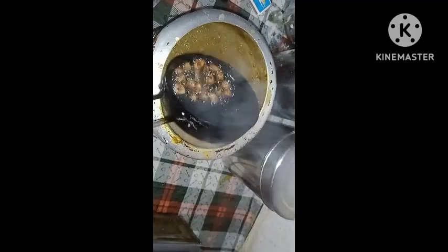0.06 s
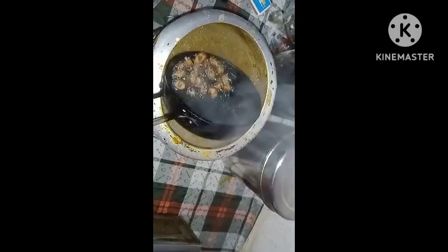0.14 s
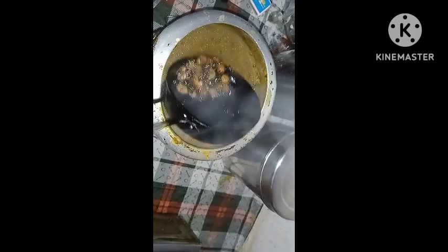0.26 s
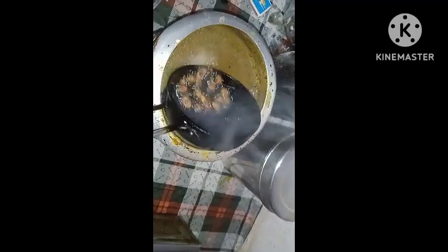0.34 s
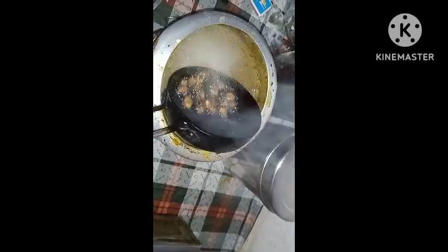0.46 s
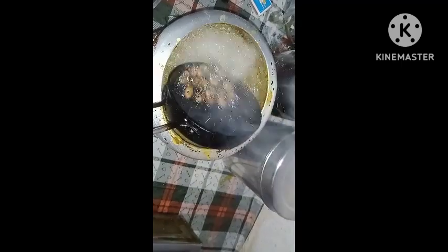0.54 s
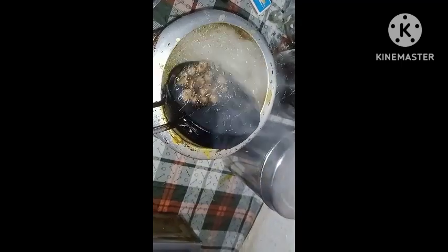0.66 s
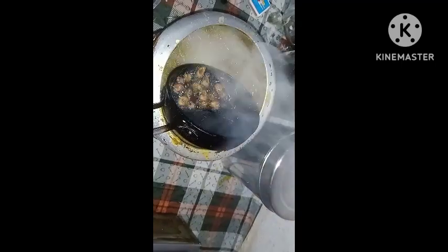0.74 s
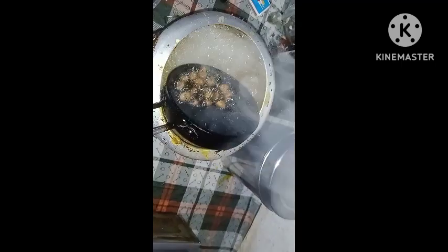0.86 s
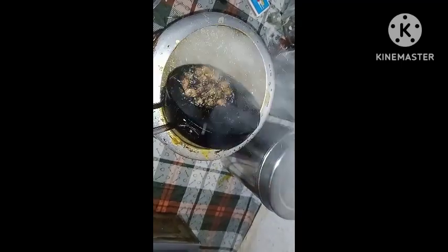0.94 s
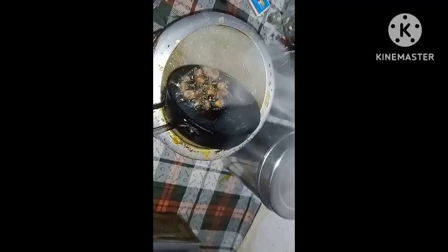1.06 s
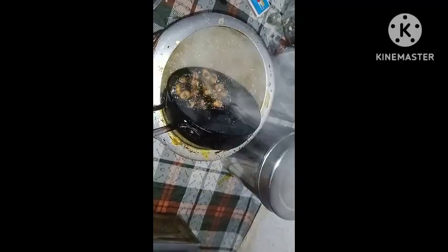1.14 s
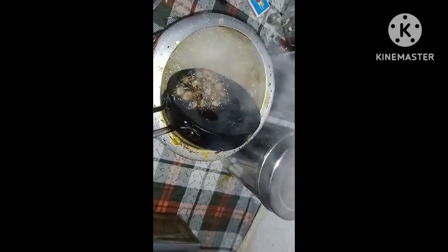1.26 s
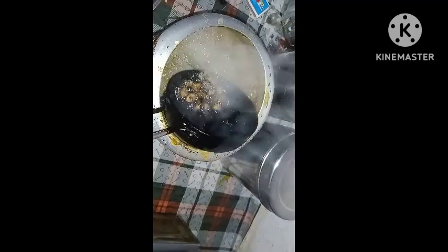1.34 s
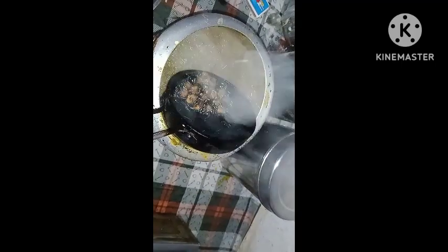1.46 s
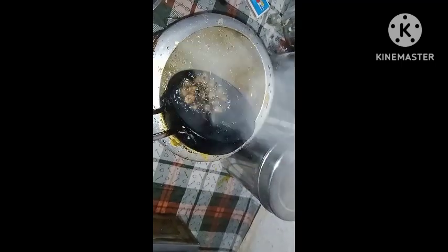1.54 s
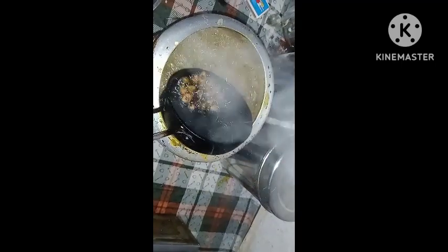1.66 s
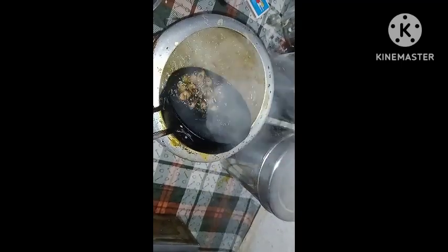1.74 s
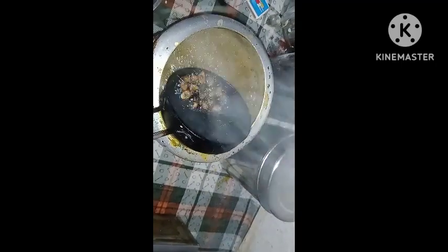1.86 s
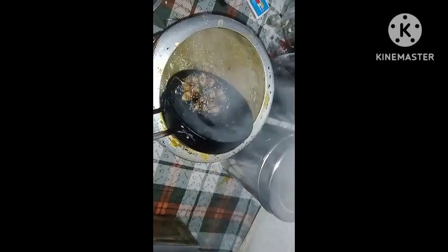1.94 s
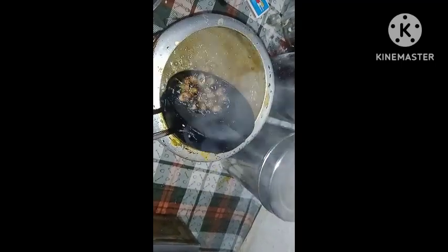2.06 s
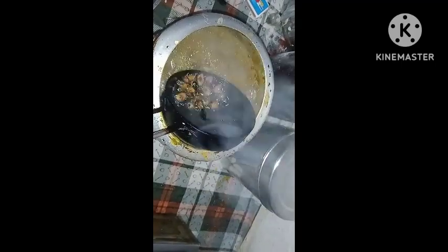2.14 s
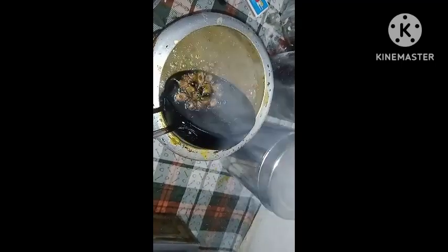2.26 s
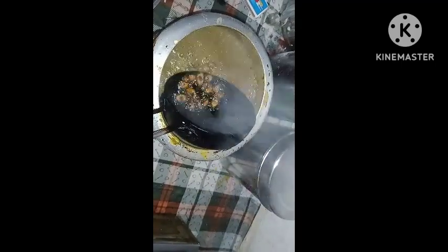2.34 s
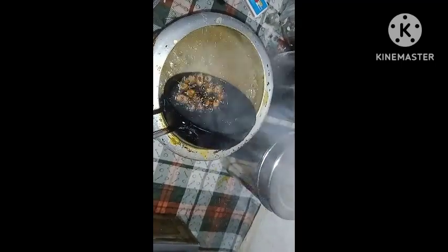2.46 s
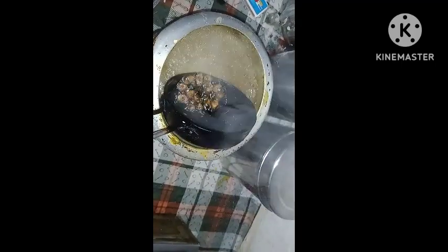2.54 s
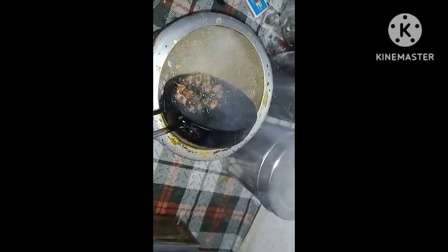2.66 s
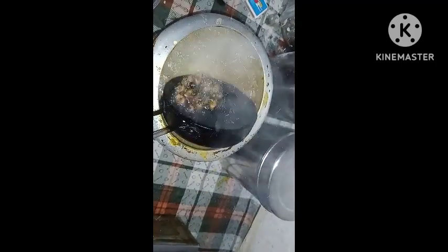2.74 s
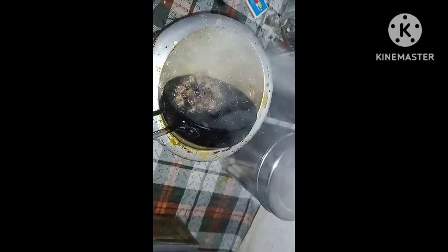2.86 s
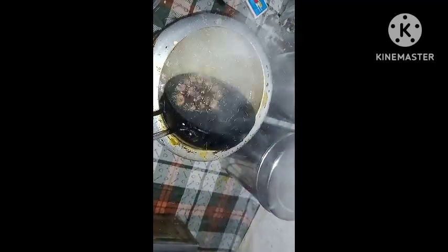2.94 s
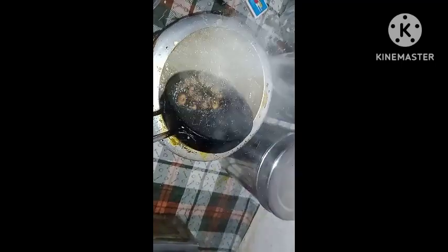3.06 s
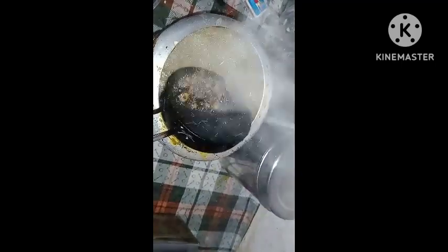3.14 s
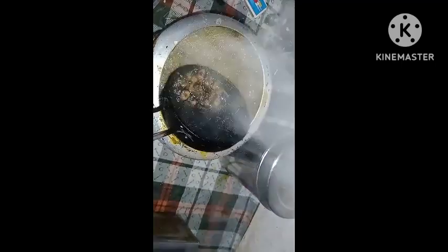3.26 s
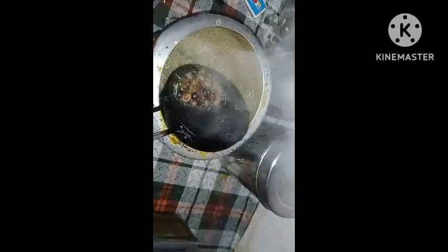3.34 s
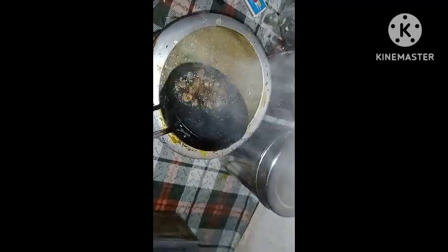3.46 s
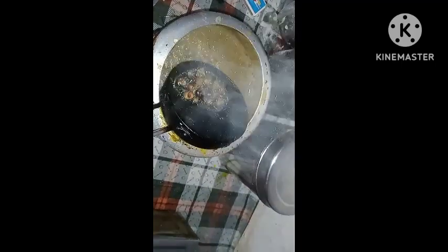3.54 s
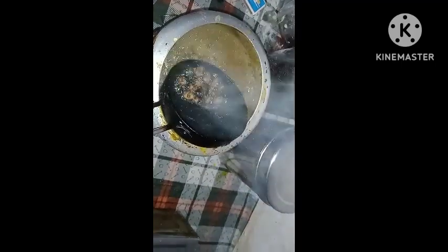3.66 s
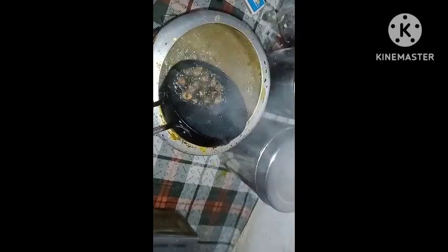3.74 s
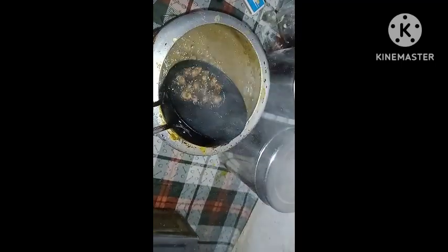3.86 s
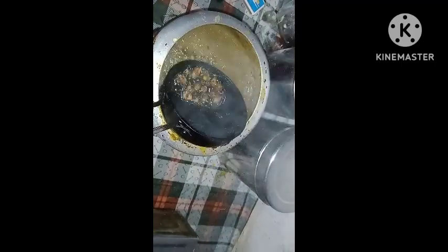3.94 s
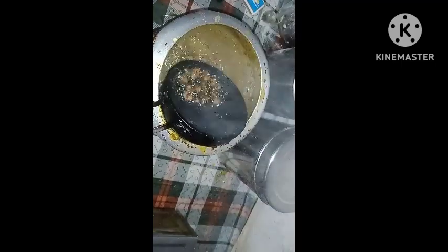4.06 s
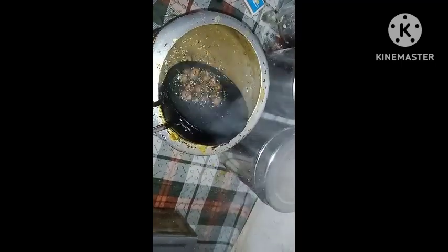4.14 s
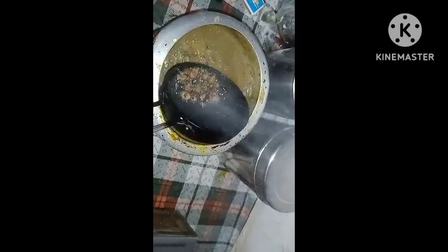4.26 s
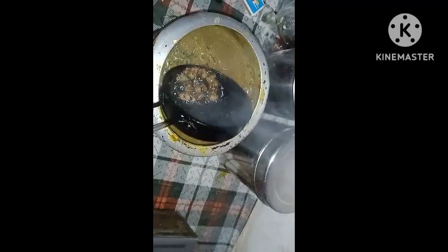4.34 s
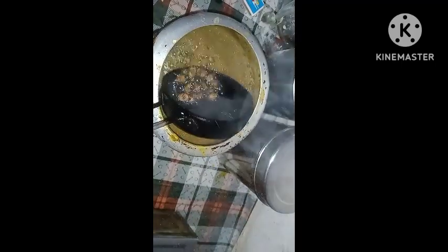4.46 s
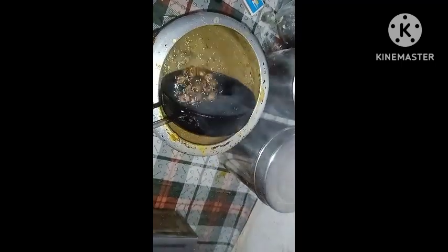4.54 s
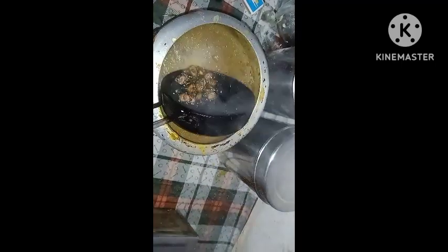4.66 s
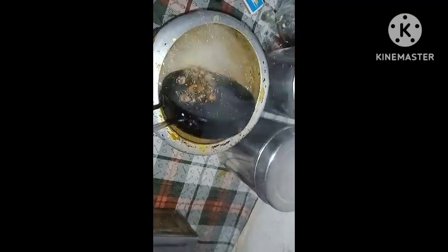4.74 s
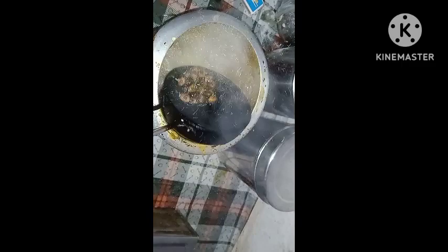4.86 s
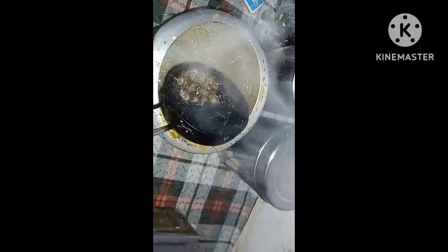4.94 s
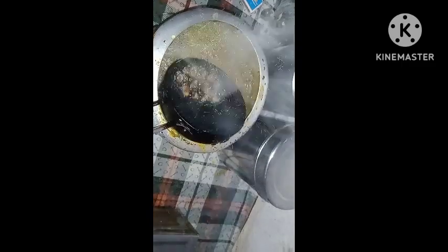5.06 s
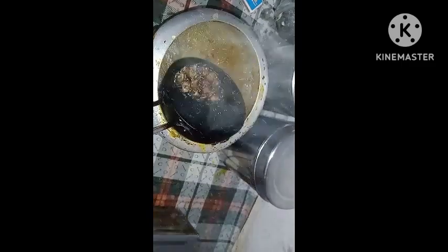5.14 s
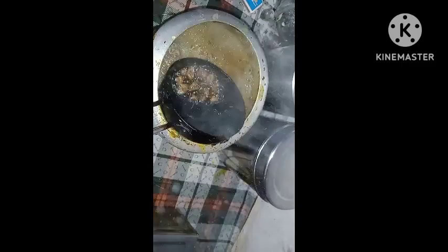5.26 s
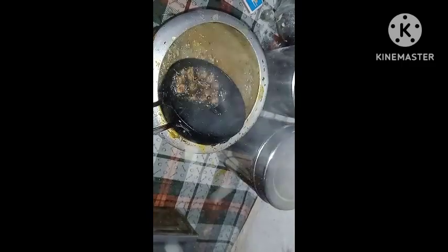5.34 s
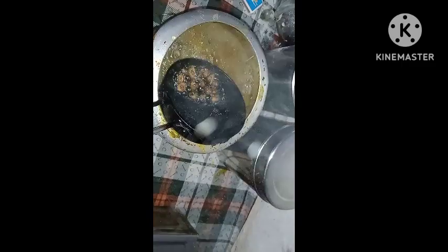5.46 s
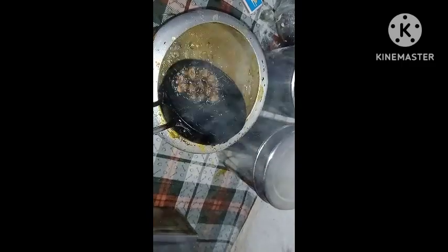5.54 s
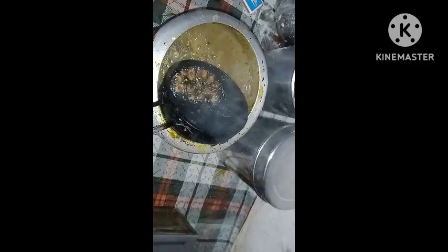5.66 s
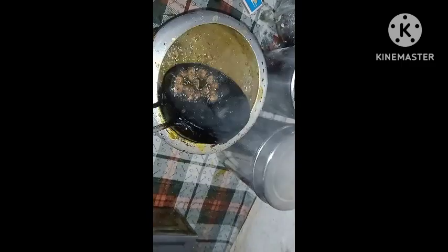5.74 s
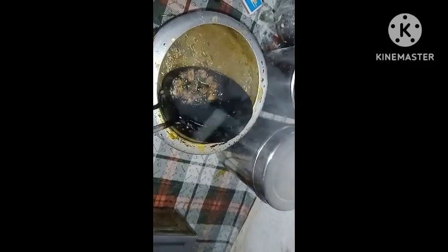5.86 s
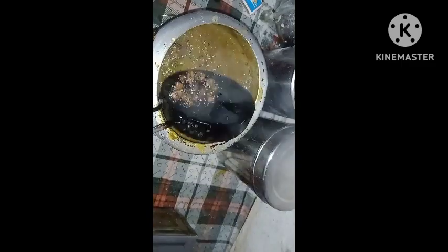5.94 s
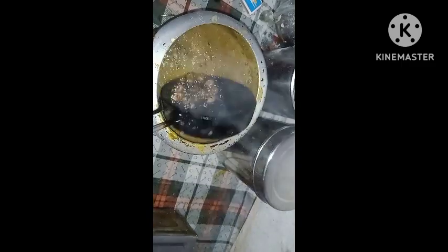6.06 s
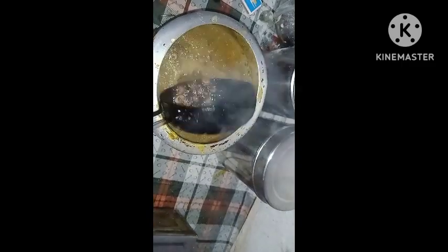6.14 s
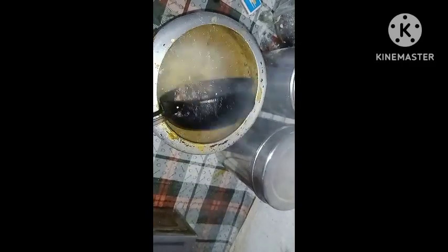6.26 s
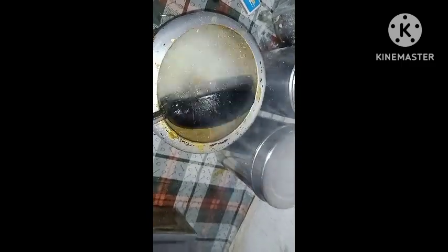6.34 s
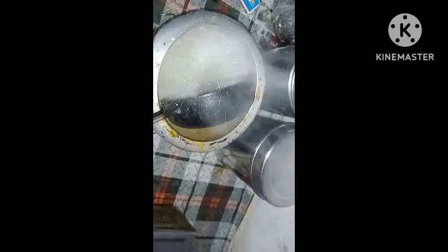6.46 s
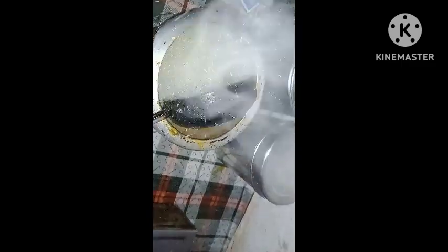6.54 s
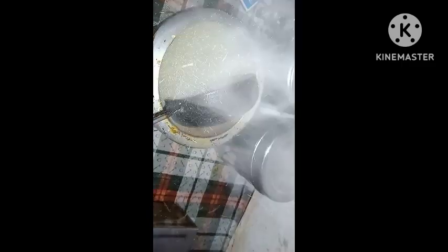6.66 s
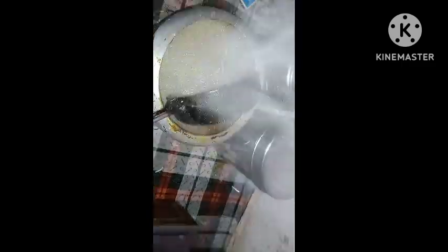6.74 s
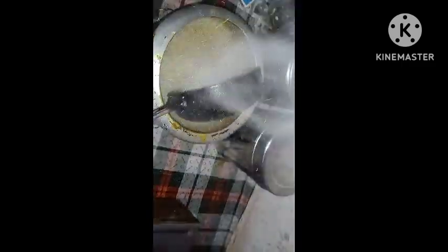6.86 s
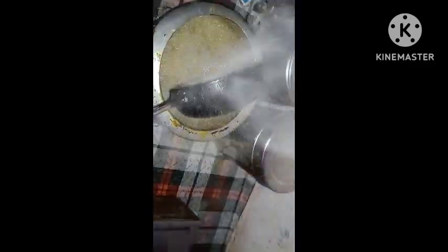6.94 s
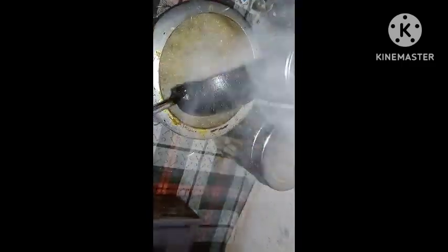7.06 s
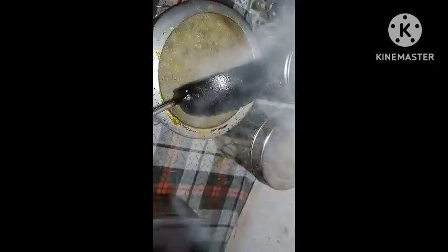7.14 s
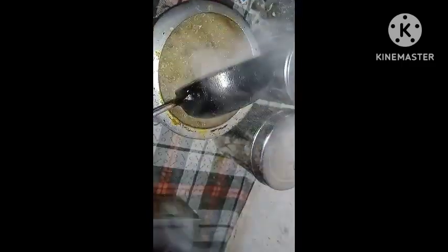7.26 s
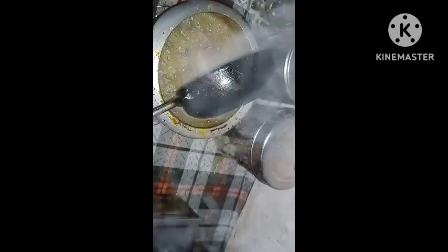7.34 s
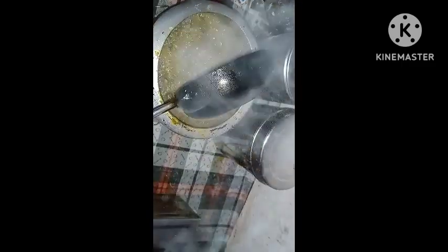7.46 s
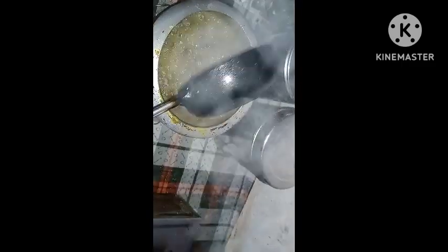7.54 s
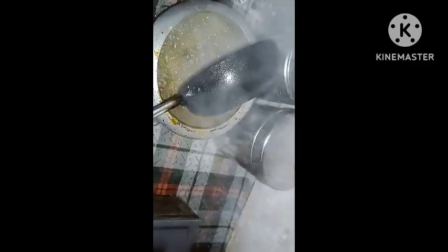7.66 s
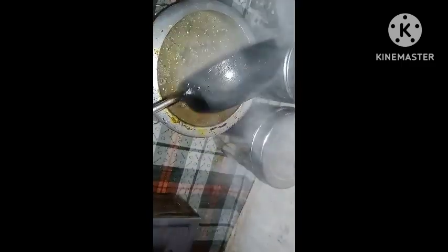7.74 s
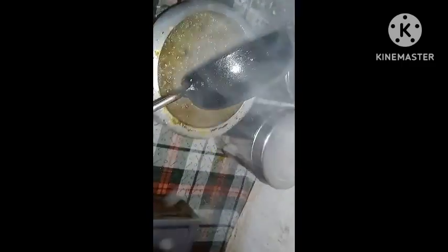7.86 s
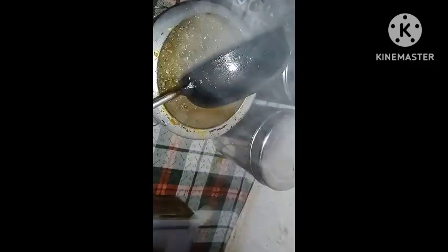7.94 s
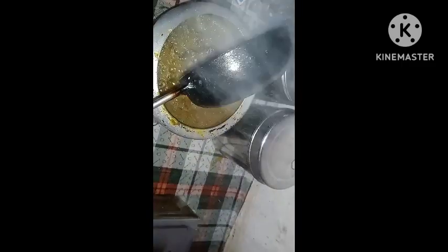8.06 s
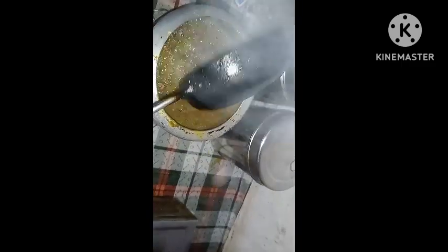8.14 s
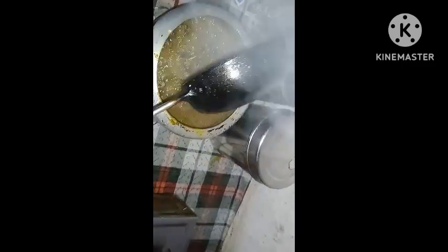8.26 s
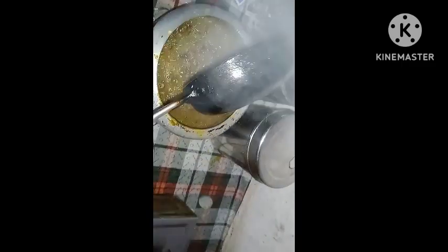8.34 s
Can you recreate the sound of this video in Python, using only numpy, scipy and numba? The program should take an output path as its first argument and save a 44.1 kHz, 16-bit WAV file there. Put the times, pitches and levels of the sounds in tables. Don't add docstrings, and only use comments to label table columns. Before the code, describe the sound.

A small pan of hot oil and garlic sizzles faintly, then hits a pot of curry with a wet plop and a fierce hiss. Several quick surges follow, settling into crackling with spits and ticks. Another swell comes midway, and the largest rush of steam bursts near the end before fading to a simmer. Close single microphone, mono, home kitchen.

```python
import sys
import numpy as np
from scipy import signal
from scipy.fft import rfft, irfft, next_fast_len
from scipy.io import wavfile
from scipy.ndimage import uniform_filter1d
from numba import njit

SR = 44100
rng = np.random.default_rng(int(sys.argv[2]) if len(sys.argv) > 2 else 0)


def decibels_to_gain(level_db):
    exponent = np.asarray(level_db, float) / 20
    return 10 ** exponent


def file_out(sig):
    cols = np.atleast_2d(sig).T
    lim = np.clip(cols, -1, 1)
    pcm = np.round(lim * 32767).astype(np.int16)
    wavfile.write(sys.argv[1], SR, pcm)


N = 369999

REGION_EDGES_HZ = [420, 1350, 2200, 3700]


def rms_one(x):
    return x / np.sqrt(np.mean(x ** 2) + 1e-20)


def in_time(rows):
    s, *columns = np.transpose(rows)
    return [np.interp(np.arange(N) / SR, s, c) for c in columns]


def drift(rate):
    r = np.exp(-64 * np.pi * rate / SR)
    noise = rng.standard_normal(N // 32 + 1002)
    slow = signal.lfilter([1], [1, -2 * r, r * r], noise)[1000:]
    return np.interp(np.arange(N) / 32, np.arange(len(slow)), rms_one(slow))


def resonance(x, hz, width_hz):
    r = np.exp(-np.pi * width_hz / SR)
    zeros = np.array([1, 0, -1]) * (1 - r * r) / 2
    return signal.lfilter(zeros, [1, -2 * r * np.cos(2 * np.pi * hz / SR), r * r], x)


@njit
def gliding(x, cosine, r):
    y = np.zeros(len(x))
    for i in range(2, len(x)):
        y[i] = x[i] - x[i - 2] + 2 * r * cosine[i] * y[i - 1] - r * r * y[i - 2]
    return y


def shaped(x, gain_at):
    size = next_fast_len(N)
    gain = gain_at(np.fft.rfftfreq(size, 1 / SR) + 1)
    return irfft(rfft(x, size) * gain, size)[:N]


def colour(points):
    hz_points, db_points = np.transpose(points)
    return lambda hz: decibels_to_gain(np.interp(np.log(hz), np.log(hz_points), db_points))


def swells(rows):
    t = np.arange(0, N + 64, 64) / SR
    power = 0
    for s, held, db, rise, fall in rows:
        early, late = np.maximum(s - t, 0), np.maximum(t - s - held, 0)
        power = power + decibels_to_gain(2 * (db - rise * early - fall * late))
    return np.interp(np.arange(N) / SR, t, power)


def self_noise():
    return decibels_to_gain(-86.0) * drift(45)


def boom(boil_db, hz, width_hz):
    # t/s, peak level/dB
    thumps = [(.3, -73), (.98, -62), (1.33, -55), (1.98, -79), (2.61, -81), (2.85, -66), (3.04, -56),
              (3.67, -76), (4.08, -67), (4.8, -59), (5.02, -55.5), (6.56, -52.5), (6.75, -46.5), (7.1, -66),
              (8.03, -66.5)]
    rise_db_s, fall_db_s, under_boil_db = 150, 51, 38
    power = swells([(s, 0, db, rise_db_s, fall_db_s) for s, db in thumps])
    power = power + decibels_to_gain(2 * (boil_db - under_boil_db))
    hum = resonance(resonance(rng.standard_normal(N), hz, width_hz), hz, width_hz)
    return np.sqrt(power) * rms_one(hum)


def plop(decay_s, rise_s):
    # t/s, peak level/dB, f/Hz
    touch = [
        (0.4264, -26, 1735),
    ]
    s, peak_db, hz = touch[0]
    age = np.maximum(np.arange(N) / SR - s, 0)
    envelope = np.exp(-age / decay_s) * np.minimum(age / rise_s, 1)
    return decibels_to_gain(peak_db) * np.sin(2 * np.pi * hz * age) * envelope


def puffs(events, decay_s, rise_s, offset_db, width_share):
    out, length = np.zeros(N + SR), SR // 10
    age = np.arange(length) / SR
    envelope = np.exp(-age / decay_s) * np.minimum(age / rise_s, 1)
    noise = rng.standard_normal((len(events), length))
    for (s, peak_db, hz), puff in zip(events, noise):
        puff = rms_one(resonance(puff, hz, width_share * hz))
        out[round(s * SR):][:length] += decibels_to_gain(peak_db + offset_db) * puff * envelope
    return out[:N]


def spits():
    # t/s, peak level/dB, f/Hz
    drops = [(0.3427, -29.5, 4970), (0.4209, -27, 4230), (0.4805, -18, 4710), (1.2186, -19, 4370),
             (2.4794, -28, 6000), (2.84, -14, 6240), (3.0706, -10, 7020), (3.27, -15.5, 3700),
             (3.4085, -23, 4230), (3.7974, -23, 6320), (3.977, -26, 7010), (4.399, -23, 4170),
             (4.5392, -25, 6300), (4.6788, -44, 5100), (5.195, -22, 4670), (5.904, -30, 3970),
             (6.0008, -28, 6350), (6.1, -20.5, 6250), (6.1564, -20, 6660), (6.1878, -37, 4530),
             (7.465, -20.5, 6040), (7.7682, -23, 3590), (8.183, -25, 4370)]
    return puffs(drops, decay_s=0.0064, rise_s=0.0021, offset_db=-13.0, width_share=0.13)


def ticks():
    # t/s, peak level/dB
    spatters = [(0.4868, -35), (0.825, -29), (1.6741, -50), (2.1241, -28), (2.3356, -23), (2.6065, -17),
                (3.6017, -32), (3.7449, -27), (4.0223, -31), (4.2288, -29), (4.452, -25), (5.2076, -40),
                (5.5603, -29), (6.1559, -39), (6.2138, -37), (7.3652, -34)]
    events = [(s, db, 10500.) for s, db in spatters]
    return puffs(events, decay_s=0.013, rise_s=.006, offset_db=-17.0, width_share=0.82)


def boil():
    # full at t/s, held t/s, open fizz level/dB, rise/(dB/s), fall/(dB/s)
    dips = [(0.49, .08, -29, 222, 59), (0.84, 0.14, -30, 180, 76), (1.23, 0.073, -29, 123, 87),
            (1.53, 0.078, -31.5, 75, 69), (2.53, 0.032, -35, 116, 45), (2.68, 0.25, -34, 58, 45),
            (3.02, 0.085, -29.5, 52, 40), (4.79, 0.2, -30, 102, 90), (5.26, 0.044, -41.5, 51, 21.5),
            (6.21, 0.077, -35.5, 139, 30), (6.38, .36, -24.5, 87, 34)]
    # t/s, open fizz level/dB
    simmer = [(0, -46), (.2, -47.5), (.33, -55), (.44, -59), (1.4, -50), (1.75, -35), (2.4, -39),
              (3.5, -46.5), (3.7, -46), (4.4, -43), (4.6, -42.5), (5.6, -49), (5.82, -48.5), (6.08, -48),
              (7.1, -39), (7.6, -41), (8.0, -43.5), (8.39, -47)]
    round_s = .04
    surges = uniform_filter1d(swells(dips), int(round_s * SR) + 1)
    return 10 * np.log10(np.maximum(surges, 0) + decibels_to_gain(2 * in_time(simmer)[0]))


def bursts(per_s, spread_db, hiss):
    sizes = decibels_to_gain(spread_db * np.minimum(rng.exponential(1, N), 4)) * rng.choice([-1, 1], N)
    pops = rms_one(sizes * (rng.random(N) < per_s / SR))
    return rms_one(pops + hiss * rng.standard_normal(N))


def bubbles(per_s, cycles, spread_db):
    sizes = decibels_to_gain(spread_db * np.minimum(rng.exponential(1, N), 3)) * rng.choice([-1, 1], N)
    born = rng.random(N) < per_s * decibels_to_gain(5 * drift(12)) / SR
    dealt = rng.integers(0, 18, N)
    out = 0
    for k, hz in enumerate(np.geomspace(600, 9000, 18)):
        kicks = sizes * born * (dealt == k) + 1e-18
        out = out + np.sqrt(hz) * resonance(kicks, hz, 2.3 * hz / cycles)
    return rms_one(out)


def fizz(steam, together_db, near_db, own_db, wander_db):
    # f/Hz, level/dB
    fizz_colour = [(40, -34), (130, -17.5), (400, -23.5), (650, -3.5), (1200, -2), (1900, -11), (2250, -15),
                   (3500, -8.5), (4000, -6), (7200, -4.5), (8000, -12.5), (10000, -12.5), (13500, -20.5)]
    # f/Hz, width/Hz, level over broad colour/dB
    modes = [(166.4, 12, 7), (211, 26, 7), (307.8, 3.1, 12), (448, 52, 11), (487, 70, -25), (553, 13, 2),
             (609, 10.6, 5), (735.8, 12.4, 13.5), (781, 15, -10.5), (861, 34, 5.5), (902, 29, -8),
             (1006, 31, 5.5), (1128, 13, 3.5), (1238, 60, -12), (1174, 18, 4), (1690, 77, 12.5),
             (1780, 30, 13), (1900, 23, 12), (2853, 40, 4), (3081, 40, 5), (3720, 90, 2), (4280, 18, 8.5),
             (5220, 110, 2.5), (5520, 83, 3.5), (5870, 22, 6), (5880, 42, 3.5), (6400, 200, 3.5),
             (6820, 49, 5), (9450, 130, -3.5), (10440, 260, 0.5)]
    edges = np.r_[20, np.geomspace(200, 18000, 25)]
    together = together_db * rms_one(.6 * drift(9) + .8 * drift(24))
    near, out = drift(9.7), 0
    for k, (low, high) in enumerate(zip(edges, edges[1:])):
        near = .7 * near + .6 * drift(8)
        band_pass = signal.butter(2, [low, high], "band", fs=SR, output="sos")
        band = signal.sosfilt(band_pass, steam[k % 2])
        high_share = np.clip(np.log2(low / 300) / 2.8, 0, 1)
        out = out + band * decibels_to_gain(high_share * (together + near_db * near) + own_db * drift(20))
    out = out + 0.25 * bubbles(per_s=900., cycles=13.7, spread_db=3.0)
    out = shaped(out, colour(fizz_colour))
    ringing = 0
    for hz, width_hz, db in modes:
        ringing = ringing + (decibels_to_gain(db) - 1) * decibels_to_gain(wander_db * drift(0.96)) * resonance(out, hz, width_hz)
    return out + ringing


def port_ring(x):
    # f/Hz, gain/dB
    port = [(13850, 0), (14250, 6), (14600, 10), (15000, 14), (15500, 15)]
    return shaped(x, colour(port))


def regions(x, overlap):
    below = []
    for edge in REGION_EDGES_HZ:
        below.append(shaped(x, lambda hz: .5 - .5 * np.tanh(np.log2(hz / edge) / overlap)))
    return [rms_one(part) for part in np.diff([0 * x] + below + [x], axis=0)]


def echoes(x, sway):
    # delay t/ms, amplitude share
    paths = [(1.3, 0.27), (2.1, 0.063), (3.4, 0.31), (5.3, 0.35)]
    at, out = np.arange(N), x
    for ms, share in paths:
        delay = ms * SR / 1000 * (1 + sway * drift(0.46))
        out = out + share * np.interp(at - delay, at, x)
    return out


def pocket(steam, hz, strength_db, width_hz, foam_db=1.8):
    hz = hz + .15 * width_hz * drift(5)[:len(steam)]
    cosine, r = np.cos(2 * np.pi * hz / SR), np.exp(-np.pi * width_hz / SR)
    broken = decibels_to_gain(foam_db * drift(9)[:len(steam)])
    return decibels_to_gain(strength_db - 3.0) * broken * rms_one(gliding(gliding(steam, cosine, r), cosine, r))


def pockets(parts, steam, main_hz, tight_db, shade_db):
    # rest f/Hz, width/Hz, share of main shift, level/dB, share of shading
    lesser = [
        (1607, 160, -0.091, -0.2, 0.045),
        (3303, 80, -0.093, -4.5, -0.25),
        (3900, 230, .3, -14.5, -0.21),
    ]
    # t/s, length t/s, f/Hz, glide/(Hz/s), level/dB
    passing = [(0.207, 0.54, 3246, -500, 8.5), (3.2, 6.7, 2447, 1.5, -1), (.5, 0.43, 3930, 14, -8),
               (1.2, 0.71, 3510, 50, 4), (1.207, .4, 4080, 306, -5), (1.26, 0.24, 7170, 12, -5),
               (1.533, .25, 3960, 800, -6), (2.05, 0.46, 4720, 10, -10), (2.193, 0.87, 1624, -50, 0.5),
               (2.743, .6, 7050, -100, -5.5), (6.207, 0.17, 4600, 200, -3), (4.9, .3, 6700, 5, -5),
               (6.45, 0.61, 3080, -100, -1.5), (6.45, 0.83, 6420, 13, -6.5), (6.947, 0.36, 4770, 16, -11),
               (7.296, 0.51, 2690, -300, 1), (7.748, 0.6, 3490, -300, -17), (8.303, 0.45, 3060, -300, -6)]
    rest_hz, main_width_hz = 1780, 123
    width_at_3k_hz, widens, edge_fade_db = 140, 1.4, 6
    out = np.array(parts)

    def region(hz):
        return np.searchsorted(REGION_EDGES_HZ, hz)

    out[region(rest_hz)] += pocket(steam, main_hz, tight_db, main_width_hz)
    for hz, width_hz, shift, db, share in lesser:
        moved_hz = hz + shift * (main_hz - rest_hz)
        out[region(hz)] += pocket(steam, moved_hz, db + share * shade_db, width_hz)
    for s, length, hz, glide, db in passing:
        span = slice(max(int((s - length) * SR), 0), min(int((s + length) * SR), N))
        age = np.arange(N)[span] / SR - s
        fade_db = edge_fade_db * (2 * age / length) ** 2
        width_hz = width_at_3k_hz * (hz / 3000) ** widens
        out[region(hz), span] += pocket(steam[span], hz + glide * age, db - fade_db, width_hz)
    return out


def sizzling_pot(boil_db):
    # t/s, main pocket f/Hz, tightness level/dB,
    # shading of the fizz level/dB, coupling to pot wall level/dB
    pan_seat = [(0, 1730, -10, -0.5, -7), (.38, 1650, -21, -3.5, -7), (.45, 1740, 1, 4.5, 3),
                (1.0, 1704, -11, -0.5, -0.4), (1.6, 1730, -31, -3.5, -0.8), (2.3, 1740, -14, -3, -0.5),
                (2.7, 1795, 2.5, -1.5, 0), (3.1, 1900, 5.5, 0.1, 0), (3.5, 1700, -5, -4, -1),
                (4.0, 1610, -13, -6, -.1), (4.85, 1900, 4, 2.8, 1.5), (5.5, 1810, -8, -5.5, 0),
                (6.12, 1790, -9, 0, -2.5), (6.33, 1930, 2.5, 8, 5.5), (6.6, 2155, -2, 3, 0.5),
                (7.05, 2100, 4.5, 10, 5), (7.45, 1820, 3.5, 5.5, 1.5), (8.39, 1627, 9, 7, -7)]
    # level over boil/dB, share of boil swing, share of shading, share of coupling
    ranges = [
        (-8, 1.043, -0.14, 0.033),
        (-5.5, 0.87, -0.22, .99),
        (-10.5, 0.91, 0.81, 0.011),
        (-0.54, 1.012, -0.19, 0.014),
    ]
    steam = [bursts(per_s=7000., spread_db=5.0, hiss=1.15), bursts(per_s=7000., spread_db=3.0, hiss=0.57)]
    sizzle = fizz(steam, together_db=1.0, near_db=-0.94, own_db=0.92, wander_db=2.8)
    parts = regions(port_ring(sizzle), overlap=0.091)
    parts[-1] = rms_one(echoes(parts[-1], sway=0.033))
    main_hz, tight_db, shade_db, wall_db = in_time(pan_seat)
    parts = pockets(parts, steam[0], main_hz, tight_db, shade_db)
    mean_fizz_db = -38
    levels_db = []
    for db, swing, shade, wall in ranges:
        level_db = mean_fizz_db + db + swing * (boil_db - mean_fizz_db)
        levels_db.append(level_db + shade * shade_db + wall * wall_db)
    lag_s = 0.036
    churn_db = np.interp(np.arange(N) - lag_s * SR, np.arange(N), levels_db[0]) - 17.5
    return sum(decibels_to_gain(level_db) * rms_one(part) for level_db, part in zip([churn_db] + levels_db, parts))


def scene():
    boil_db = boil()
    background = self_noise() + boom(boil_db, hz=98.0, width_hz=8.3)
    small = plop(decay_s=0.0057, rise_s=0.0023) + spits() + ticks()
    return np.tile(background + small + sizzling_pot(boil_db), (2, 1))


def top_cut(x):
    return signal.sosfilt(signal.butter(12, 15510, fs=SR, output="sos"), x)


def record(dry):
    return top_cut(dry)


dry = scene()
out = record(dry)
file_out(out)
```